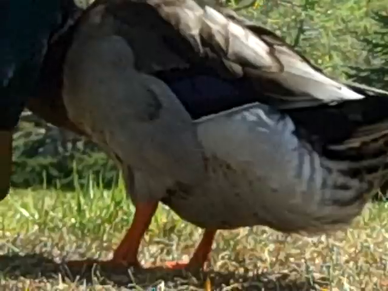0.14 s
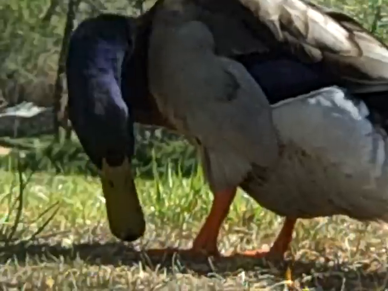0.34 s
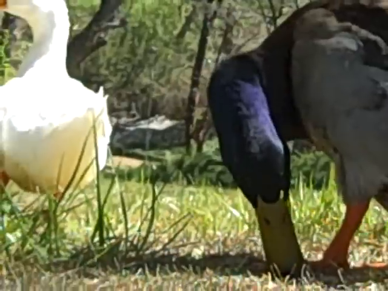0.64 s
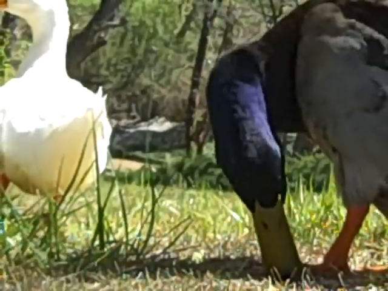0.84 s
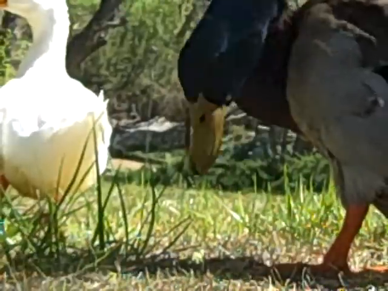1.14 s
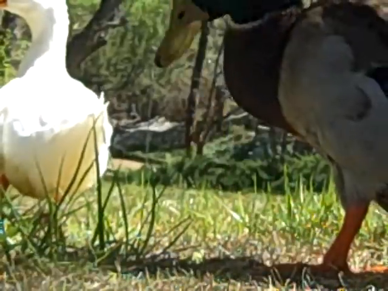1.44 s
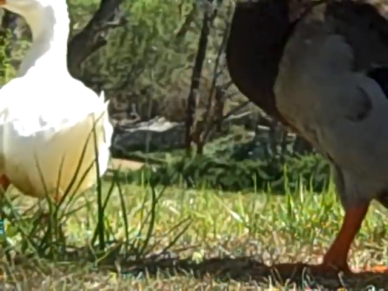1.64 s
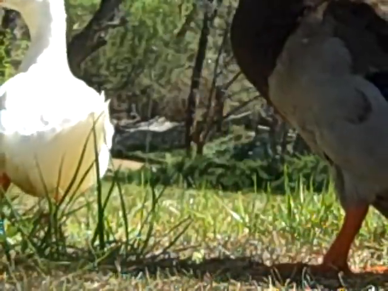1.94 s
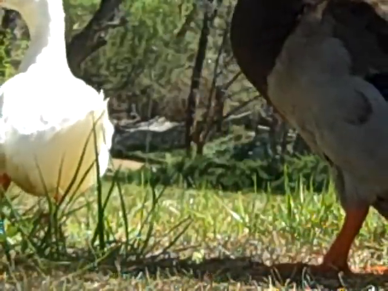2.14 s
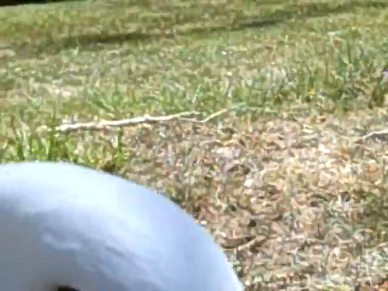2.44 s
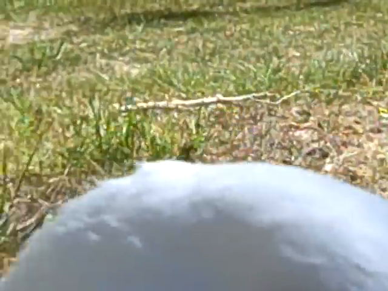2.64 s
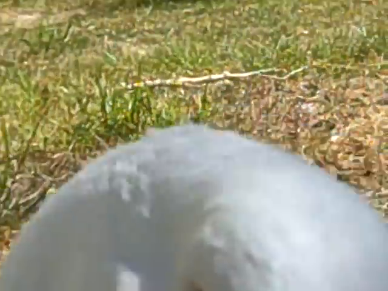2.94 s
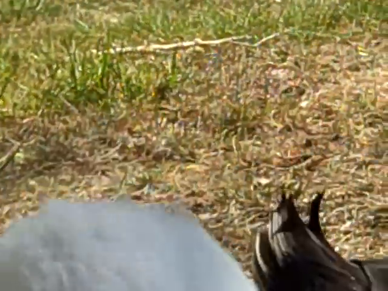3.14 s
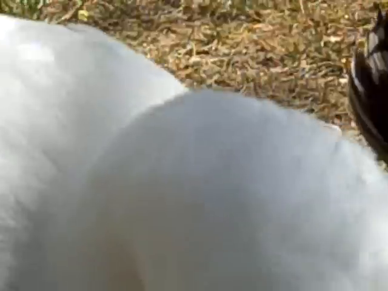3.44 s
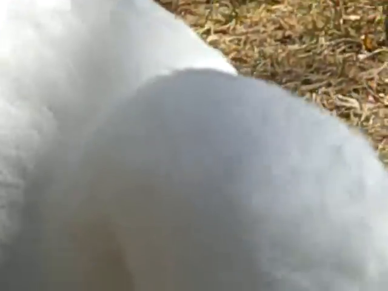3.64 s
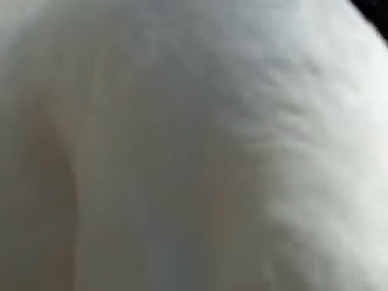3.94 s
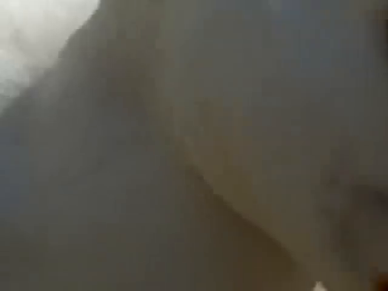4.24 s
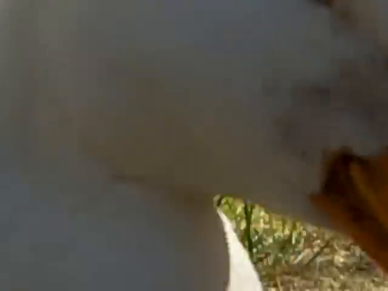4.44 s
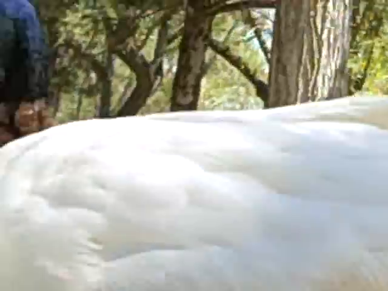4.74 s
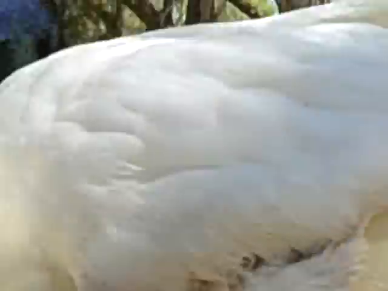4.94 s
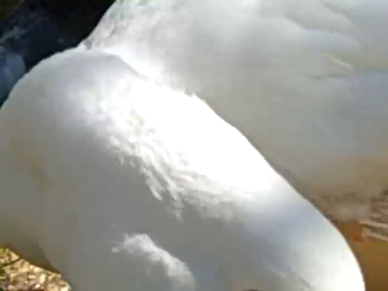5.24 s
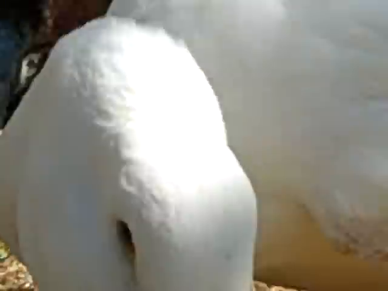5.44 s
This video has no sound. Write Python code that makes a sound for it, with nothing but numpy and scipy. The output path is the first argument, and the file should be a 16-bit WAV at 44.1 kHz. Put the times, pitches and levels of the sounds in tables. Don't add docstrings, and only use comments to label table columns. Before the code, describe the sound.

A close, dry outdoor scene with a very faint airy hush. Two moderate hoarse quacks come at about 0.1 s, then weaker ones to 0.4 s, with grass rustles. From 0.35 to 0.9 s fingers rub and tick the device shell, with hollow low thumps near 0.6 s. From 1 to 2.2 s it is quiet: a few faint quacks, light scuffs and small chirps. At 2.3 s near ducks begin, each call a short, nasal, grating burst of slow rapid-fire pulses: 2.35, 2.55, 2.95, a loudest one at 3.15, a softer one at 3.4, then 3.6, 3.8, 4.3, a strong one at 4.5 and a last at 4.7. Straw snaps at 2.4 s and crackles thickly from 4.5 s. Thin bird whistles slide and flick throughout, clearest around 4 s. From 5 to 5.6 s there are no quacks, only sharp knocks, thumps, feather hiss and dry crackling.

```python
import sys
import numpy as np
from scipy import signal
from scipy.fft import rfft, irfft
from scipy.io import wavfile
from scipy.ndimage import uniform_filter1d

SR = 44100
rng = np.random.default_rng(int(sys.argv[2]) if len(sys.argv) > 2 else 0)


def how_loud(loudness_db):
    steps = np.asarray(loudness_db, float) / 20
    return 10 ** steps


def unload_wav(signal):
    wavfile.write(
        sys.argv[1],
        SR,
        np.round(np.clip(np.atleast_2d(signal).T, -1, 1) * 32767).astype(np.int16),
    )


N = 246519
TIME = np.arange(N) / SR


def level(x, db):
    return x * how_loud(db) / np.sqrt(np.mean(x ** 2) + 1e-20)


def ring(x, hz, width_hz):
    return signal.lfilter(*signal.iirpeak(hz, hz / width_hz, fs=SR), x)


def ring_twice(x, hz, width_hz):
    return ring(ring(x, hz, width_hz), hz, width_hz)


def body(x, modes):
    out = 0
    for k, (hz, width_hz, db) in enumerate(modes):
        out = out + (-1) ** k * how_loud(db) * ring_twice(x, hz, width_hz) / np.sqrt(width_hz)
    return out


def colour(x, spectrum):
    hz, db = np.transpose(spectrum)
    f = np.fft.rfftfreq(len(x), 1 / SR) + 1
    return irfft(rfft(x) * how_loud(np.interp(np.log(f), np.log(hz), db)), len(x))


def walk(rate_hz):
    k = int(SR / rate_hz)
    steps = np.repeat(rng.standard_normal(N // k + 1), k)
    return 1.2 * uniform_filter1d(steps, k)[:N]


def crackle(rate_hz, spread_db):
    k = int(SR / rate_hz)
    at = np.arange(0, N - k, k)
    at = at + rng.integers(0, k, len(at))
    hits = np.zeros(N)
    hits[at] = how_loud(spread_db * np.minimum(rng.exponential(size=len(at)), 3))
    return rng.standard_normal(N) * signal.lfilter([1], [1, -np.exp(-1 / k)], hits)


def bursts(rows, rise_db_s, fall_db_s, rest_db):
    t = TIME[::64]
    s, hold_s, db = np.transpose(rows)[:, :, None]
    db = db - rise_db_s * np.maximum(s - t, 0) - fall_db_s * np.maximum(t - s - hold_s, 0)
    power = np.sum(how_loud(db) ** 2, axis=0) + how_loud(rest_db) ** 2
    return np.interp(TIME, t, np.sqrt(power))


def add(out, s, x):
    i = int(s * SR)
    x = x[max(-i, 0):N - i]
    out[max(i, 0):max(i, 0) + len(x)] += x


# pitch_hz, density_db_per_hz
HUSH_SPECTRUM = [(12, -53.5), (20, 7.5), (32, -13.5), (75, -2), (146, -9.5), (664, -9.5), (831, -8.5),
                 (1460, -11.5), (1870, -12), (2340, -12), (9250, -24.5), (16200, -37)]


def hush():
    x = colour(rng.standard_normal(N), HUSH_SPECTRUM)
    low = signal.lfilter(*signal.butter(2, 700, fs=SR), x)
    high = x - low
    return level(low * how_loud(2.0 * walk(2.1)) + high * how_loud(0.4 * walk(28)), -64)


# start_s, hold_s, level_db
GRASS_MOVES = [(0, .03, -71), (.058, 0.012, -50.5), (.155, 0.016, -52.5), (.34, 0.18, -63.5),
               (.59, 0.046, -52), (.66, 0.13, -63.5), (1.35, 0.96, -68), (2.15, 0.16, -62.5),
               (2.33, 0.021, -61), (2.4, 0.022, -45), (2.475, 0.018, -50), (2.55, 0.32, -66),
               (3.07, 0.17, -60.5), (3.55, 0.34, -63), (3.9, 0.97, -64.5), (4.46, .065, -52.5),
               (4.53, 0.018, -50), (4.6, 0.35, -66), (4.845, 0.022, -52.5), (5.03, 0.02, -52),
               (5.08, 0.14, -56.5), (5.28, .012, -54), (5.31, 0.092, -60.5), (5.42, 0.18, -63),
               (5.56, .03, -69)]
# pitch_hz, density_db_per_hz
RUSTLE_SPECTRUM = [(880, -23.5), (1500, -18.5), (2470, -11.5), (2920, -12.5), (3360, -10.5), (5050, -14.5),
                   (12000, -17), (15300, -19.5), (16200, -14)]


def grass_rustle():
    low_grass, high_grass = [crackle(220, 4.2) + 1.6 * rng.standard_normal(N) for _ in range(2)]
    crossover = signal.butter(2, 6000, fs=SR)
    grass = high_grass + signal.lfilter(*crossover, low_grass - high_grass)
    rustle = level(colour(grass, RUSTLE_SPECTRUM), 1.2)
    return rustle * bursts(GRASS_MOVES, rise_db_s=435, fall_db_s=360.5, rest_db=-75)


# start_s, crack_db,
# pitch_hz
SNAPS = [(0.502, -47, 4000), (0.734, -43, 4000), (0.7588, -38, 2980), (0.943, -44, 4500),
         (1.341, -47.5, 5000), (1.9444, -46, 5000), (2.4067, -27, 10000), (2.477, -39, 7000),
         (2.489, -31.5, 7000), (2.7057, -42, 13000), (3.006, -50, 7050), (3.324, -45.5, 8970),
         (3.4325, -51, 10000), (3.6685, -44, 11900), (3.697, -53, 12000), (4.19, -53, 12500),
         (4.197, -55, 12500), (4.2355, -41, 12200), (4.355, -48, 12500), (4.5061, -24, 12000),
         (4.552, -31.5, 8000), (4.56, -31, 7600), (4.6087, -28.5, 9050), (4.638, -45, 8000),
         (4.7091, -34, 9000), (4.767, -39, 10400), (4.777, -43, 11000), (4.8217, -29.5, 11600),
         (4.945, -44, 3440), (4.997, -38, 10600), (5.0573, -28, 12000), (5.0664, -28.5, 7000),
         (5.0846, -37, 9000), (5.121, -37.5, 4000), (5.129, -39, 3500), (5.157, -37.5, 3200),
         (5.179, -33.5, 4400), (5.1831, -36, 8500), (5.307, -28, 9500), (5.3297, -35, 3460),
         (5.365, -44, 7500), (5.371, -41, 11000), (5.379, -32, 7040), (5.4202, -38, 5000),
         (5.4215, -34, 12900), (5.43, -33, 4350), (5.461, -43, 6050), (5.4872, -44, 4000),
         (5.518, -50, 2450), (5.548, -29, 6200), (5.018, -19.5, 12000), (5.3463, -30, 12000),
         (5.035, -40, 12500), (5.585, -38, 9000), (.068, -29, 9500), (.22, -48, 12500), (.474, -41, 9000),
         (.679, -45, 7000), (.689, -48, 9000), (.735, -44, 10000), (.759, -44, 11000), (.775, -50, 12000),
         (2.477, -32, 11000), (2.653, -50, 8000)]


def straw_snaps():
    out, t = np.zeros(N), TIME[:SR // 20]
    for s, crack_db, hz in SNAPS:
        air = rng.standard_normal(len(t))
        click = (air + 3 * (t == 0)) * how_loud(-60 * t / .004)
        click = ring_twice(click, hz, .5 * hz)
        add(out, s, click * how_loud(crack_db) / abs(click).max())
    return out


LAG_MS_PER_KHZ, LAG_MID_HZ, LAG_TOP_HZ = 1.8, 1700, 2600


def windpipe(modes, stretch, size):
    f, out = np.fft.rfftfreq(size, 1 / SR), 0
    for k, (hz, width_hz, db) in enumerate(modes):
        mode = 1j * f * width_hz / ((hz * stretch[:, None]) ** 2 - f ** 2 + 1j * f * width_hz)
        lag_s = LAG_MS_PER_KHZ * (min(hz, LAG_TOP_HZ) - LAG_MID_HZ) / 1e6
        late = np.exp(-2j * np.pi * f * lag_s)
        out = out + (-1) ** k * how_loud(db) * late * mode ** 2 / np.sqrt(width_hz)
    return out * (1j * f / (800 + 1j * f)) ** 3


# pitch_hz, width_hz, level_db
CHEST = [(973, 139, -9.5), (1294, 150, -2)]
MIDDLE = [(2662, 290, -1), (2988, 200, -3), (3507, 340, -1), (4200, 270, -9.5)]
UPPER = [(5726, 130, -8.5), (6600, 380, -12.5)]
BILL_PER_MAIN = 2.29
CREST_MS, CREST_PER_SKEW = -1.5, 0.15
OPEN_DB, MAIN_PER_DB, MIDDLE_PER_DB = -21, 1.1, 1.56
LEAD_S = .16


def quack(call, throat, chance, air):
    _, flap_hz, db, swell_ms, fade_ms = call
    low_hz, main_hz, main_db, middle_db, bill_db = throat
    bill_hz, loud_db = BILL_PER_MAIN * main_hz, max(db - OPEN_DB, 0)
    main_db = main_db + MAIN_PER_DB * loud_db
    middle_db = middle_db + MIDDLE_PER_DB * loud_db

    size = air.shape[1]
    order = np.arange(len(air)) - len(air) // 2
    t = (np.arange(size) - size // 4) / SR
    flaps_s = order / flap_hz + .0003 * chance[0] * np.sqrt(abs(order)) - .0015

    late_ms = flaps_s * 1000 - (CREST_MS + CREST_PER_SKEW * (swell_ms - fade_ms))
    away = abs(late_ms) / np.where(late_ms < 0, swell_ms, fade_ms)
    effort = 0.54 * how_loud(-14 * away ** 3.2) + 0.065 * how_loud(-6 * away ** 2)

    leak = .11 + .45 * (1 - effort[:, None]) ** 2
    puff = np.exp(-.5 * (t / np.where(t < 0, .0017, .0016)) ** 2)
    puff = puff + leak * np.cos(np.clip(t * flap_hz, -1, 1) * np.pi / 2)
    snap = 2.6 * np.exp(-.5 * (t / .00005) ** 2)
    drive = puff * air + snap

    stretch = 1 - .085 * (1 - effort) + .018 * chance[2]
    modes = [(low_hz, 290, 1.5), (main_hz, 200, main_db + 2)]
    modes += [(hz, w, d + middle_db) for hz, w, d in MIDDLE]
    modes += [(bill_hz, 550, bill_db)] + [(hz, w, d + bill_db) for hz, w, d in UPPER]
    modes += [(10650, 290, -41 + loud_db), (9100, 8100, -24)]
    tube = windpipe(modes, stretch, size)
    tube += windpipe(CHEST, 1 + 0.056 * chance[1], size) / (effort[:, None] + 0.0084) ** 0.43

    rings = irfft(rfft(drive) * tube)
    expected = drive.std(axis=1) * np.sqrt(np.mean(abs(tube) ** 2, axis=1))
    rings *= (expected / rings.std(axis=1))[:, None]
    voice = np.zeros(int(.4 * SR))
    for start_s, gain, flap in zip(flaps_s, effort * how_loud(.9 * chance[1]), rings):
        add(voice, start_s + LEAD_S, gain * flap)
    peak_power = uniform_filter1d(voice ** 2, int(0.014 * SR)).max()
    return voice * how_loud(db) / np.sqrt(peak_power)


# strongest_flap_s, flap_hz, level_db, swell_ms, fade_ms
QUACKS = [
    [(2.5403, 77.1, -16.5, 19, 54.7), (3.1357, 74.8, -14, 18.9, 31.8), (3.5955, 63.7, -23.5, 37, 21.7),
     (3.7871, 67.7, -21.5, 23.4, 36.3), (4.2972, 66.8, -20, 32.4, 24.6), (4.4977, 77.56, -14.5, 34.4, 27.6)],
    [(2.3431, 68.4, -20, 27.6, 36.6), (2.9341, 70.5, -19.5, 23, 26.6), (4.7219, 74.2, -22, 24.5, 26)],
    [(0.1415, 77, -34.5, 39, 18), (3.3881, 71, -31.5, 34.5, 13.6)],
    [(0.07, 75.4, -29, 28.5, 25)],
    [(0.981, 74.3, -46.5, 19, 50), (1.5075, 68.4, -53, 17, 110), (1.6616, 77.6, -39.5, 20.5, 40),
     (2.0627, 74.9, -46.5, 28, 53), (2.2693, 72.5, -42.5, 25, 24)],
    [(0.219, 68.7, -48.5, 26, 32), (0.4106, 66.85, -44.5, 57, 21)],
    [(1.7545, 73.2, -39.5, 36, 21.4)],
]
# low_mode_hz, main_mode_hz, main_db, middle_db, bill_db
THROATS = [(1707, 2149, -3.5, -14, -12), (1550, 2119, -2, -13, -14), (1846, 2226, -6.5, -20.5, -18.5),
           (1500, 1995, 1, -9.5, -15), (1217, 1896, -3.5, -6.5, -11), (1280, 1830, -5.5, -17, -40),
           (1760, 2320, 0, -5, -2)]


def ducks():
    out = np.zeros(N)
    calls = [(call, throat) for drake, throat in zip(QUACKS, THROATS) for call in drake]
    flaps, flap_samples = 17, 2800
    chances = rng.standard_normal((len(calls), 3, flaps))
    airs = rng.standard_normal((len(calls), flaps, flap_samples))
    for (call, throat), chance, air in zip(calls, chances, airs):
        start_s = call[0] - LEAD_S - flap_samples // 4 / SR
        add(out, start_s, quack(call, throat, chance, air))
    t = TIME[:SR // 4]
    scatter = rng.standard_normal(len(t)) * how_loud(-60 * t / 0.054)
    return out + signal.fftconvolve(out, level(scatter, -50.5))[:N]


# start_s, hold_s, level_db
BRUSHES = [(.095, 0.0097, -50.5), (.155, .02, -51), (.185, 0.01, -58), (.6, 0.024, -58), (2.4, 0.012, -57),
           (2.475, 0.017, -58.5), (3.6, 0.014, -58), (3.91, 0.011, -61.5), (4.53, 0.074, -55),
           (4.835, 0.029, -49), (5.185, 0.021, -53), (5.275, 0.0099, -42), (5.575, .015, -58)]


def feather_brush():
    hiss = level(ring_twice(rng.standard_normal(N), 12000, 9000), 0)
    return hiss * bursts(BRUSHES, rise_db_s=1200, fall_db_s=900, rest_db=-120)


# start_s, hold_s, level_db
AIR_PUFFS = [(.17, 0.1, -68), (.36, 0.081, -54.5), (.59, 0.019, -47.5), (.66, 0.16, -62), (2.2, 1, -69),
             (2.92, 0.25, -56), (3.49, 0.031, -55), (3.57, 0.066, -59.5), (3.7, 0.72, -71),
             (4.35, 0.035, -54), (4.44, 0.33, -62), (5.045, 0.027, -50.5), (5.29, 0.07, -54),
             (5.46, 0.0072, -49), (5.52, .07, -83)]


def air_rumble():
    rumble = level(ring(crackle(60, 2.5), 185, 230), -2.)
    return rumble * bursts(AIR_PUFFS, rise_db_s=226, fall_db_s=180.5, rest_db=-85)


# start_s, level_db, pitch_hz, t60_s
THUMPS = [(0.195, -41, 158, 0.12), (0.477, -45, 156, 0.095), (0.603, -25, 222, 0.12),
          (0.649, -32.5, 202, 0.097), (0.654, -44.5, 107, 0.21), (0.821, -45, 177.2, 0.31),
          (3.089, -38, 100.7, 0.074), (3.484, -22, 193, 0.023), (4.36, -32, 269.6, 0.077),
          (5.023, -30, 233, 0.2), (5.289, -20.5, 233, 0.024), (5.417, -27.5, 228, 0.067),
          (5.479, -28, 212, 0.04), (5.571, -45.5, 156, 0.14)]


def shell_thumps():
    out, t = np.zeros(N), TIME[:SR // 3]
    push = 1 - np.exp(-t / .004)
    for s, db, hz, t60_s in THUMPS:
        add(out, s, 0.5 * how_loud(db - 60 * t / t60_s) * push * np.sin(2 * np.pi * hz * t))
    return out


# start_s, crack_db,
# shell_ring_db
TICKS = [(0.1965, -54, -49), (0.338, -39, -46.5), (0.408, -42, -39), (0.5455, -43, -41.5),
         (0.5656, -38, -42), (0.6051, -32, -32.5), (0.6431, -30.5, -31), (0.7144, -57, -46.5),
         (0.7771, -42, -44.5), (0.8041, -42, -45), (0.828, -41, -43), (0.846, -45, -44), (0.88, -41, -37.5),
         (1.4213, -61, -47.5), (1.483, -44, -43), (2.036, -55, -48), (2.3048, -28.5, -25.5),
         (2.894, -25, -24), (3.973, -44.5, -54), (4.2404, -46, -38), (4.252, -37, -30.5), (4.789, -45, -45),
         (4.9972, -44, -54), (5.019, -15.5, -18), (5.0577, -36, -46), (5.0842, -48, -38.5),
         (5.2825, -58, -32.5), (5.348, -30, -37), (5.4645, -43, -45.5)]
# pitch_hz, width_hz, level_db
SHELL = [(644, 910, -8.5), (1067, 430, 0.5), (1340, 390, -5.5), (1900, 900, -6)]


def finger_ticks():
    out, t = np.zeros(N), TIME[:SR // 20]
    for s, crack_db, ring_db in TICKS:
        air = rng.standard_normal(len(t))
        blow = (air + 2.5 * (t == 0)) * how_loud(-60 * t / .009)
        crack = ring(blow, 4200, 3100) + 0.4 * ring(blow, 7600, 2900)
        shell = body(air * how_loud(-60 * t / .014) + 3 * (t == 0), SHELL)
        add(out, s, crack * how_loud(crack_db) / abs(crack).max() + shell * how_loud(ring_db + 8) / abs(shell).max())
    return out


# start_s, hold_s, level_db
SCUFFS = [(.375, 0.086, -49), (.53, 0.039, -49), (.59, 0.025, -37), (.64, 0.0081, -43.5), (.73, 0.16, -54),
          (1.445, 0.026, -47), (1.49, 0.069, -51), (2.05, 0.047, -56), (2.1, 0.093, -59.5),
          (2.17, 0.07, -52), (5.03, 0.03, -43.5), (5.07, 0.086, -64.5), (5.279, 0.017, -47.5),
          (5.36, 0.023, -56), (5.415, 0.02, -51.5), (5.47, 0.014, -59), (5.535, 0.0092, -59)]


def scuffs():
    grit = crackle(200, 6.5)
    scrape = level(body(grit, SHELL), -1.5) + level(body(grit, [(3600, 700, 0)]), -10.)
    scrape += (TIME < .7) * level(body(grit, [(10000, 1700, 0), (13000, 1500, -6)]), -11.)
    return scrape * bursts(SCUFFS, rise_db_s=603, fall_db_s=700, rest_db=-120)


# note_share, pitch_hz, level_db
DIP = [(0, 8000, -13), (.58, 7100, -1.5), (1, 7350, 4)]
FLICK = [(0, 5300, 0.6), (1, 6250, -1.5)]
SWOOP = [(0, 7530, -30.5), (.15, 8270, -10.5), (.31, 6190, 0), (.49, 4900, -7), (1, 7000, -3)]
ARCH = [(0, 4010, -2), (.42, 6200, -9), (.7, 4300, 4.5), (1, 3660, -6)]
HUMP = [(0, 5200, -4), (.3, 5900, -1.5), (.55, 6150, 0), (1, 5050, -1.5)]
# shape, then rows of start_s, length_s, pitch_factor, level_db
SONG = [
    (DIP, [(2.68, .04, 1.01, -67), (2.82, .04, .985, -64), (2.95, .035, .98, -61), (3.068, .044, 1.005, -57), (3.2, .05, 1.005, -58)]),
    (FLICK, [(2.712, .008, 1.04, -63), (2.85, .01, 1.005, -65), (2.975, .011, .96, -63), (3.24, .012, .995, -59)]),
    (SWOOP, [(3.984, .068, .99, -47), (4.09, .062, 1.01, -47)]),
    (HUMP, [(1.674, .028, .535, -49), (2.225, .025, .58, -57), (3.8, .03, 1.01, -55), (.694, .028, .51, -53), (1.617, .013, .82, -53), (3.455, .01, .86, -62), (3.466, .013, .89, -58), (3.48, .012, .89, -58), (3.72, .035, 1.005, -53)]),
    (ARCH, [(4.233, .03, 1.04, -51), (4.338, .03, .99, -56), (4.545, .032, .93, -57), (4.646, .03, .95, -55)]),
]
# start_s, length_s, from_hz, to_hz, level_db
SLIDES = [(.9, .08, 3500, 4200, -66), (2.41, .04, 3800, 3600, -60), (.657, .014, 4540, 2700, -55),
          (.673, .012, 2750, 2950, -58), (.722, .025, 2600, 2750, -59), (1.025, .065, 3300, 4200, -74),
          (1.612, .008, 3260, 4800, -58), (1.628, .018, 4900, 2910, -52), (1.405, .014, 3000, 2500, -62),
          (1.66, .012, 4000, 4900, -60), (3.832, .016, 9500, 5900, -58), (2.66, .13, 2800, 2860, -66),
          (3.49, .033, 5000, 2780, -57), (3.668, .008, 2900, 4300, -63), (3.676, .008, 2700, 4400, -60),
          (3.682, .012, 3200, 4150, -56), (3.742, .03, 8300, 6060, -55), (3.75, .025, 9210, 6850, -60),
          (3.82, .028, 8500, 5840, -57), (3.885, .012, 3200, 3790, -57), (3.908, .037, 3300, 4150, -46),
          (4.185, .025, 4500, 2900, -56), (4.39, .022, 3740, 2690, -59), (4.598, .027, 3600, 2500, -55),
          (5.05, .01, 3200, 2500, -58), (5.06, .022, 2500, 3200, -57), (5.21, .065, 2900, 3900, -67),
          (5.5, .06, 4500, 3800, -70)]


def notes():
    out = []
    for shape, rows in SONG:
        share, hz, shape_db = np.transpose(shape)
        for s, length_s, factor, db in rows:
            out.append((s + length_s * share, factor * hz, db + shape_db))
    share = np.array([0, .5, 1])
    for s, length_s, from_hz, to_hz, db in SLIDES:
        hz = from_hz + (to_hz - from_hz) * share
        out.append((s + length_s * share, hz, db - 2 * abs(2 * share - 1)))
    return out


def birds():
    out = np.zeros(N)
    wobble = walk(160)
    for s, hz, db in notes():
        t = np.arange(s[0] - .002, s[-1] + .003, 1 / SR)
        glide_hz = uniform_filter1d(np.interp(t, s, hz), size=200)
        glide_hz *= 1 + .016 * wobble[int(t[0] * SR):][:len(t)]
        phase = 2 * np.pi * np.cumsum(glide_hz) / SR
        edge = np.clip(np.minimum(t - t[0], t[-1] - t) / 0.0029, 0, 1)
        tone = np.sin(phase) + .025 * np.sin(2 * phase)
        add(out, t[0], np.sqrt(2) * edge * how_loud(np.interp(t, s, db)) * tone)
    t = TIME[:SR // 3]
    trees = rng.standard_normal(len(t)) * how_loud(-60 * t / 1.2)
    echo = signal.fftconvolve(out, level(trees, -52))[:N]
    return out * how_loud(3 * walk(240) + 1) + echo


# start_s, level_db
POPS = [
    (2.343, -32),
    (3.1359, -19),
    (4.4967, -19),
]


def capsule_pops():
    out, t = np.zeros(N), TIME[:SR // 3]
    for s, db in POPS:
        add(out, s, how_loud(db) * np.exp(-t / .0007) * (t / .00085 - 1))
    return out


def scene():
    animals = ducks() + birds()
    grass_and_air = grass_rustle() + air_rumble() + feather_brush()
    handling = scuffs() + finger_ticks() + straw_snaps() + shell_thumps() + capsule_pops()
    return (animals + grass_and_air + handling + hush())[None, :]


def roll_off(x):
    return signal.sosfilt(signal.butter(12, 16640, fs=SR, output="sos"), x)


def record(dry):
    sag = signal.lfilter([.0001], [1, -.9999], dry ** 2)
    wet = np.tanh(0.7 * dry) / 0.57 - 0.039 * dry ** 2 - 0.45 * sag
    top_cut = signal.ellip(8, .2, 45, 15800, fs=SR, output="sos")
    mix = signal.sosfilt(top_cut, wet)
    return roll_off(mix)


dry = scene()
out = record(dry)
unload_wav(out)
```